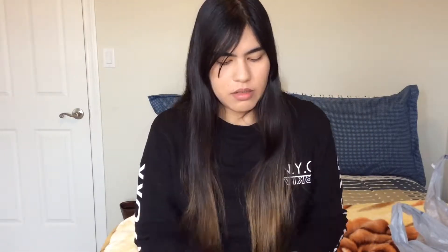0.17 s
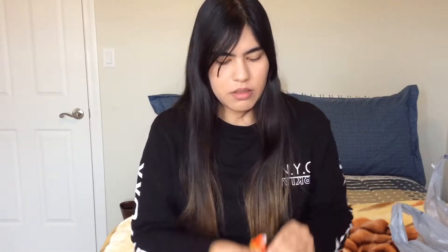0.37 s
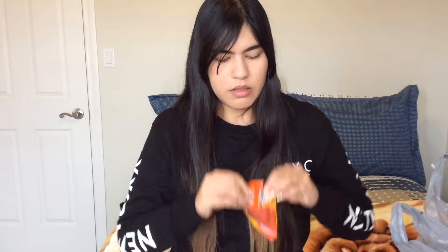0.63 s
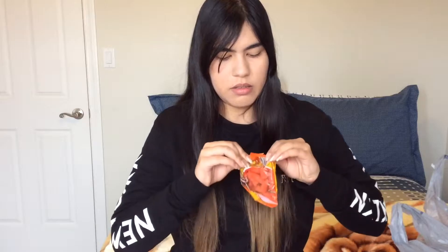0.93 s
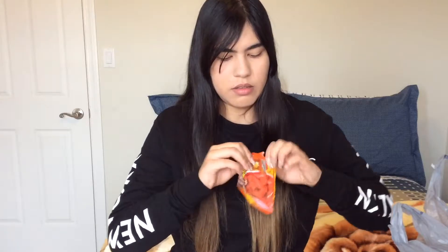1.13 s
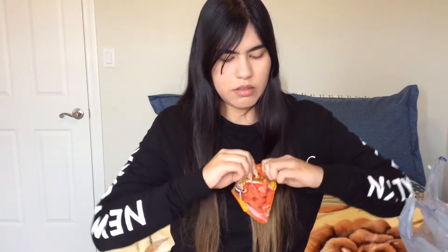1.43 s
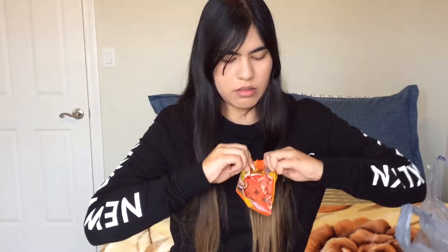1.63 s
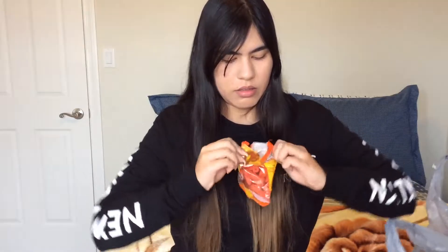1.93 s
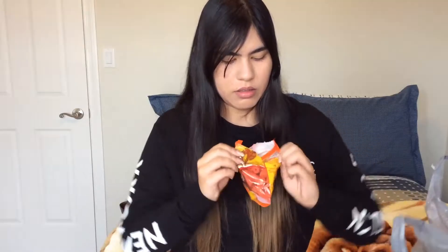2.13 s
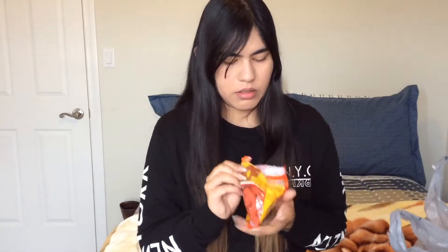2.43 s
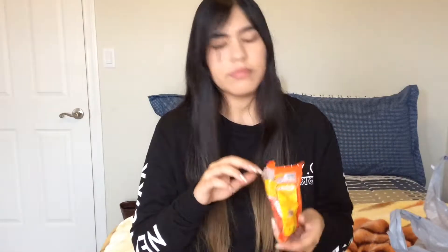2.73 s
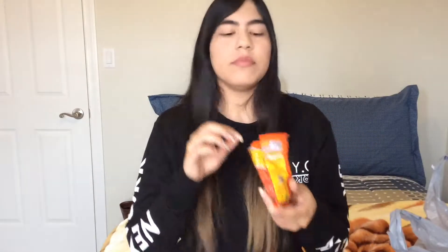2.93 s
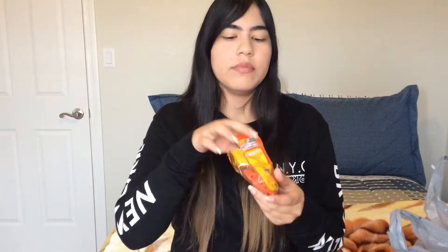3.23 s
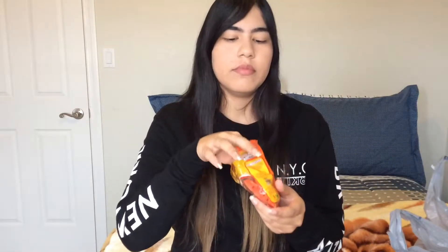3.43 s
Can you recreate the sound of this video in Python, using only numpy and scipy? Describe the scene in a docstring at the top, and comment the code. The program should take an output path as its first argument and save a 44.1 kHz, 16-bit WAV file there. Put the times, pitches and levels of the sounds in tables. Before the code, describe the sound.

A small plastic candy packet crinkles with crisp snaps and crackles, rips open in a short loud burst, then is handled more quietly; close-range microphone in a small bedroom with faint room tone.

```python
"""Bedroom: a small plastic candy packet is handled and torn open, a metre from the microphone.
Creases in the film snap singly (ring, bag knock, treble tick) and in dense crackle of filtered clicks;
taps push air softly. Echoes and a decaying tail throw the film sound back, over steady noise as room tone.
A hard edit joins two moments of the handling, so the first room tail stops dead."""
import sys
import numpy as np
from scipy import signal
from scipy.fft import rfft, irfft
from scipy.io import wavfile

SR = 44100
rng = np.random.default_rng(int(sys.argv[2]) if len(sys.argv) > 2 else 0)


def bounce(signal):
    """Save signal as a 16-bit WAV file at the path given by the first command-line argument."""
    frames = np.transpose(np.atleast_2d(signal))
    limited = np.clip(frames, -1, 1)
    pcm = np.round(limited * 32767).astype(np.int16)
    wavfile.write(sys.argv[1], SR, pcm)


N = 158760

EDIT_S = 2.7508
GRAIN_N = 768  # samples per snap or crackle grain
RISE_S = 0.00015
FLIP_DECAY_S = 0.0006
BURST_S = 0.003  # burst levels are rms over this time


def amp(db):
    """Amplitude factor of a level in dB."""
    return 10 ** (np.asarray(db) / 20)


def unit(x):
    """Scale each row to energy 1."""
    return x / np.linalg.norm(x, axis=-1, keepdims=True)


def evened(x):
    """Scale to rms 1."""
    return x / np.sqrt(np.mean(x ** 2) + 1e-20)


def read(points, hz):
    """Interpolate a frequency table along log frequency."""
    f, value = np.transpose(points)
    return np.interp(np.log(hz + 1), np.log(f + 1), value)


def snaps():
    """Each snap is a flip with a short ring, a low knock of the bag and a treble tick; rows: direct, wall send."""
    # loudest snaps: (time [s], ring [Hz], middle level [dB], low knock level [dB], treble level [dB],
    # wall send [dB])
    snap_table = [(0.031, 1530, -47.5, -51, -62, -2.5), (0.0936, 1420, -53, -63, -75, 10),
                  (0.123, 4700, -50, -53, -66, 7), (0.1556, 4300, -44.5, -51, -62, -5),
                  (0.1871, 3760, -49, -47, -60, -11), (0.2064, 1340, -44, -66, -74, -5),
                  (0.2312, 1220, -50, -50, -72, -9), (0.2518, 1410, -50, -44.5, -46, 6),
                  (0.2562, 1210, -40, -50, -44, -14), (0.2766, 3220, -36.5, -68, -45, -11),
                  (0.3323, 6030, -29, -56, -32, 3), (0.342, 1860, -32, -34, -37, 0.5),
                  (0.377, 6300, -54, -43.5, -40, 13), (0.38, 5500, -29.5, -54, -28, 2.5),
                  (0.3948, 4850, -34, -39, -34, 6), (0.4541, 2100, -36, -34.5, -35, 3),
                  (0.4754, 5200, -29.5, -43, -26.5, 4.5), (0.4878, 1860, -35.5, -48, -31, 10),
                  (0.5117, 1400, -21, -51, -45, -5), (0.531, 6460, -33.5, -44.5, -48, 6.5),
                  (0.5397, 2080, -29, -43, -50, -5), (0.5625, 5200, -30, -65, -23, -0.5),
                  (0.5753, 4050, -28.5, -58, -25, -8), (0.6066, 4090, -35, -40.5, -38, 0),
                  (0.6197, 5470, -41, -43, -44, 2), (0.638, 1230, -33, -38.5, -28, -4),
                  (0.664, 1290, -41, -46, -40, 0), (0.6694, 4230, -18.5, -53, -40, -6),
                  (0.6872, 3920, -23.5, -55, -24.5, -1.5), (0.699, 5000, -26, -38, -35, -22),
                  (0.7584, 3460, -18, -58, -16, -4.5), (0.8113, 1420, -35, -51, -36, 7),
                  (0.8187, 5940, -31.5, -59, -35, 5), (0.834, 2940, -39, -53, -34, -6),
                  (0.8433, 3730, -18.5, -41, -17, -1.5), (0.8653, 3750, -33, -35, -22, -12),
                  (0.9224, 1840, -41, -45, -70, 0), (1.0049, 6300, -34.5, -44, -32, 0.5),
                  (1.019, 1570, -32, -54, -52, -5), (1.1047, 4840, -39, -64, -43, 7),
                  (1.1122, 2470, -35, -39, -39, -6), (1.1456, 1480, -32, -52, -33.5, -11),
                  (1.1558, 5930, -62, -44, -33, 7), (1.1629, 2550, -29, -40, -34.5, -4),
                  (1.1847, 6100, -33, -47, -35, -20), (1.2001, 2640, -26.5, -34.5, -35, -5),
                  (1.2075, 3000, -39, -51, -39, 0), (1.2196, 6100, -23, -41, -26, -17),
                  (1.2712, 4200, -31.5, -45, -27, 3.5), (1.281, 4500, -27, -43, -30, -9),
                  (1.275, 4700, -21, -48, -25.5, -8), (1.298, 5940, -26, -53, -35, -23),
                  (1.3145, 5210, -30, -42, -44, -18), (1.3371, 5000, -22, -61, -48, -9.5),
                  (1.3588, 1160, -37, -54, -55, -6), (1.3734, 2460, -46, -44.5, -45, -5),
                  (1.4097, 1910, -42, -59, -49, 1), (1.4142, 4740, -47, -57, -45, -22),
                  (1.4308, 3270, -34, -42, -59, 4), (1.44, 5900, -44, -43, -22, -7.5),
                  (1.4754, 3300, -47, -62, -48, 7), (1.4826, 1970, -39, -62, -38, 5),
                  (1.5163, 5800, -46, -56, -28, -2), (1.5375, 3440, -17, -57, -17, -3.5),
                  (1.5825, 1090, -34.5, -35.5, -32.5, 0.5), (1.5991, 1910, -22.5, -45, -35, -9),
                  (1.6378, 2520, -32.5, -41, -32, -8), (1.7066, 6300, -52, -54, -46, -1),
                  (1.7236, 6600, -47.5, -51, -45, 2), (1.7496, 4730, -28, -40, -34, -22),
                  (1.7583, 1150, -36.5, -37, -35, -5), (1.772, 5030, -28, -38, -47, -5),
                  (1.7893, 5260, -22.5, -32, -39, -3), (1.8016, 1200, -35, -18.5, -26, -2.5),
                  (1.8107, 5000, -19, -33, -32, -6), (1.819, 2880, -25.5, -51, -23, 9.5),
                  (1.851, 1230, -19.5, -20, -17, -5.5), (1.8598, 6070, -33, -27, -18, -12),
                  (1.8774, 6600, -10, -24, -20, -18), (1.918, 5500, -27, -45, -37, -10),
                  (1.9224, 5650, -24.5, -30.5, -38, 4.5), (1.9471, 6350, -13.5, -43, -17, -9),
                  (1.962, 1860, -22, -25, -32, -7), (1.9693, 6200, -42, -25.5, -22, -15),
                  (1.972, 2840, -29, -42, -22, -3), (2.0253, 1250, -41, -54, -50, 4),
                  (2.0412, 1940, -40, -50, -37, 6.5), (2.074, 5950, -40, -41, -51, -6),
                  (2.1065, 1214, -43.5, -66, -42, 3), (2.1123, 1220, -40, -42, -58, -16),
                  (2.1535, 4520, -42, -57, -43, -21), (2.1751, 1520, -38.5, -39.5, -41, -29),
                  (2.202, 6440, -22.5, -51, -27.5, -5.5), (2.2297, 1350, -37.5, -40, -42, -2),
                  (2.249, 2100, -36, -52, -58, -5), (2.261, 1630, -27.5, -50, -30, -5.5),
                  (2.2954, 4800, -42, -38.5, -39, -5), (2.303, 5680, -45, -59, -33, -7),
                  (2.3311, 2060, -45, -45, -46, -16), (2.344, 6100, -49, -55, -42, -7),
                  (2.352, 5100, -28, -54, -32, -5), (2.3553, 6100, -26, -32, -30, -3),
                  (2.3756, 4570, -31, -36, -34, -14), (2.421, 1210, -40, -37.5, -46, -2.5),
                  (2.4432, 4000, -40, -57, -47, -19), (2.446, 3000, -22, -24.5, -27, -11),
                  (2.449, 3150, -26.5, -22, -25, -7), (2.4741, 7600, -35.5, -37.5, -40, -5),
                  (2.5018, 1550, -32.5, -48, -49, -6.5), (2.5468, 2440, -46, -60, -44, 14),
                  (2.5524, 5050, -49, -56, -48, 8), (2.5563, 1690, -48, -59, -45, 0),
                  (2.59, 1200, -36.5, -41, -42, -2), (2.6097, 3310, -32, -44, -34, 0),
                  (2.6287, 1250, -37, -36, -39, -3.5), (2.6551, 4230, -31, -46, -27.5, -2),
                  (2.6944, 3430, -47, -45, -52, -15), (2.7196, 6200, -35, -68, -28, -8),
                  (2.725, 5370, -51, -46, -39, -2), (2.8043, 3400, -47.5, -59, -45.5, 3),
                  (2.8231, 2350, -48, -46.5, -62, 5), (2.8632, 6740, -35, -49, -34, -8),
                  (2.9462, 1560, -51.5, -79, -73, 1), (2.9534, 6000, -61, -73, -69, -12),
                  (3.001, 2520, -29.5, -59, -41, -1), (3.052, 3640, -54, -63, -71, 2),
                  (3.115, 3300, -57, -59, -55, -1), (3.1897, 2440, -39, -50.5, -39.5, 3),
                  (3.2862, 4570, -49.5, -72, -56, 11.5), (3.3113, 1910, -38, -42, -39.5, -1.5),
                  (3.33, 1510, -48, -50, -54, -3), (3.3955, 1940, -51, -65, -69, -7),
                  (3.4182, 1720, -52, -57, -53, -2), (3.4568, 1290, -41.5, -39, -36.5, -2),
                  (3.512, 3200, -50, -49, -72.5, -4), (3.5661, 1890, -51, -49.5, -61, -10)]
    ring_share, ring_cycles = 0.56, 1.66
    band_ratio = 1.7  # flip band edges around the ring
    max_send_db = 6

    count = len(snap_table)
    all_knocks = knocks(count)
    all_ticks = flips(count, decay_s=0.00035, band_hz=(5000, 10220))
    phases = rng.random(count)
    out = np.zeros((2, N + GRAIN_N))
    for row, knock, tick, phase in zip(snap_table, all_knocks, all_ticks, phases):
        s, hz, db, low_db, high_db, send_db = row
        flip = flips(1, FLIP_DECAY_S, (hz / band_ratio, hz * band_ratio))[0]
        ring = ping(hz, ring_cycles, phase)
        middle = unit(ring_share * ring + (1 - ring_share) * flip)
        mix = amp(db) * middle + amp(low_db) * knock + amp(high_db) * tick
        snap = np.sqrt(BURST_S * SR) * mix
        start = round((s - RISE_S) * SR)
        out[:, start:start + GRAIN_N] += snap * amp([[0], [min(send_db, max_send_db)]])
    return out[:, :N]


def ping(hz, cycles, phase):
    """A facet of film rings for a few cycles; energy 1."""
    t = np.arange(GRAIN_N) / SR
    envelope = np.exp(-hz * t / cycles) * (1 - np.exp(-(t / RISE_S) ** 2))
    return unit(np.sin(2 * np.pi * (hz * t + phase)) * envelope)


def flips(count, decay_s, band_hz):
    """A sharp click with a short gritty noise trail, band-passed; energy 1, one per row."""
    grit_share = 0.85
    t = np.arange(GRAIN_N) / SR
    envelope = (1 - np.exp(-(t / RISE_S) ** 2)) * np.exp(-t / decay_s)
    grit = unit(rng.standard_normal((count, GRAIN_N)) * envelope)
    at_click = np.arange(GRAIN_N) == round(RISE_S * SR)
    click = at_click * rng.choice([-1., 1.], (count, 1))
    band = signal.butter(2, band_hz, "band", fs=SR, output="sos")
    return unit(signal.sosfilt(band, click + grit_share * grit))


def knocks(count):
    """Dull noisy flips; the air in the bag rings under each."""
    ring_share, ring_cycles = 0.4, 1.14
    rings = []
    for pitch, phase in rng.random((count, 2)):
        hz = 677 * (0.832 + 0.38 * pitch)  # 563 to 821 Hz
        rings.append(ping(hz, ring_cycles, phase))
    dull = flips(count, decay_s=0.0014, band_hz=(443, 1190))
    return unit(ring_share * np.array(rings) + (1 - ring_share) * dull)


def handling():
    """The fingers work the film as bright and low crackle; the seal rips in one dense rush."""
    # one list per moment of handling: (time [s], crackle level [dB], low crackle level [dB])
    moments = [
        [(0, -60, -54), (.1, -60, -70), (.245, -57.5, -71), (.255, -43, -60), (.32, -41, -48), (.36, -32, -59),
         (.45, -34, -51.5), (.55, -35, -55), (.7, -36.5, -46), (.74, -49, -49.5), (.8, -44.5, -59),
         (.86, -30.5, -42.5), (.9, -47.5, -55), (1.0, -46.5, -58.5), (1.1, -57, -61), (1.15, -41, -54),
         (1.22, -34, -41), (1.3, -33, -48), (1.38, -47, -53), (1.45, -42.5, -55), (1.55, -34.5, -38.5),
         (1.63, -39.5, -48.5), (1.68, -48.5, -61), (1.74, -48.5, -54.5), (1.76, -32, -48), (1.9, -27.5, -37),
         (1.98, -34, -34), (2.05, -41, -54.5), (2.18, -49.5, -50), (2.3, -42.5, -54.5), (2.345, -44.5, -51),
         (2.375, -31, -40), (2.42, -43.5, -63), (2.53, -51.5, -57.5), (2.57, -41, -47.5), (2.66, -39, -54),
         (2.75, -44, -49)],
        [(2.8, -74, -75), (2.83, -45.5, -54), (2.9, -54.5, -62), (2.97, -61.5, -90), (3.17, -67, -72),
         (3.25, -69, -59), (3.34, -55, -56), (3.45, -55, -59), (3.6, -70, -63)],
    ]
    tear_s, tear_hold_s, tear_fade_s = 1.8, 0.077, 0.0098
    tear_db, tear_low_db, tear_per_s = -20, -27, 3500

    t = np.arange(N) / SR
    levels = []
    for moment in moments:
        s, high_db, low_db = np.transpose(moment)
        levels.append([np.interp(t, s, high_db), np.interp(t, s, low_db)])
    db, low_db = np.where(t < EDIT_S, levels[0], levels[1])

    bright, dull = film_grains(), knocks(count=16)
    rip = amp(tear_db) * crackle(bright, tear_per_s, spread_db=1.3)
    rip += amp(tear_low_db) * crackle(dull, tear_per_s / 4, spread_db=0.97)
    tear = (t > tear_s) * np.exp(-np.maximum(t - tear_s - tear_hold_s, 0) / tear_fade_s)
    high = crackle(bright, per_s=700, spread_db=3.5)
    low = crackle(dull, per_s=500, spread_db=1.5)
    return amp(db) * high + amp(low_db) * low + tear * rip


def crackle(grains, per_s, spread_db):
    """Many small creases flip at random moments; a few are large. Rms 1."""
    size = amp(spread_db * np.minimum(rng.exponential(1, N), 3.0))
    hits = size * (rng.random(N) < per_s / SR)
    kind = rng.integers(0, len(grains), N)
    out = np.zeros(N)
    for k, grain in enumerate(grains):
        out += signal.oaconvolve(hits * (kind == k), grain)[:N]
    return evened(out)


def film_grains(count=24):
    """Broad flips in the colour of the film, leaning from dull to bright."""
    # colour of the crackle: (frequency [Hz], relative level [dB])
    film_colour = [(710, -42), (1200, 4), (1830, 6.5), (2620, 5), (3400, 4.5), (8000, 5), (14400, -10),
                   (15300, -15), (16000, -39)]
    hz = np.fft.rfftfreq(GRAIN_N, 1 / SR)
    tilt = 0.43 * np.linspace(-1, 1, count)[:, None]
    lean = ((hz + 1) / 4500) ** tilt
    raw = np.roll(flips(count, FLIP_DECAY_S, (500, 18000)), 40, axis=1)
    return unit(irfft(rfft(raw) * amp(read(film_colour, hz)) * lean, GRAIN_N))


def thumps():
    """A finger taps the air-filled bag: soft low pushes of air, each a quickly decaying sine."""
    # taps: (time [s], level [dB])
    taps_table = [(1.851, -38.5), (2.355, -58), (2.376, -41), (2.448, -34), (2.479, -61)]
    push_hz, peak_cycles, push_n = 264, 0.64, 1500
    turns = push_hz * np.arange(push_n) / SR
    envelope = turns * np.exp(1 - turns / peak_cycles) / peak_cycles
    push = np.sin(2 * np.pi * turns) * envelope
    out = np.zeros(N)
    for s, db in taps_table:
        out[round(s * SR):][:push_n] += amp(db) * push
    return out


def in_room(direct, send, count=4):
    """Direct sound plus echo patterns that take turns, as the echo paths change when the packet moves."""
    turn_s = 0.11
    turn = np.arange(N) / SR / turn_s
    out = direct
    for k in range(count):
        distance = abs((turn - k + count / 2) % count - count / 2)
        window = np.cos(np.pi / 2 * np.minimum(distance, 1))
        out = out + signal.oaconvolve(send * window, room())[:N]
    return out


def room():
    """Impulse response: single wall echoes plus sparse random taps dying band by band."""
    # wall echoes: (delay [s], level [dB])
    echo_table = [(.0053, -8), (.0082, -9.5), (0.0149, -18), (0.021, -18)]
    # tail decay: (frequency [Hz], time to fall 60 dB [s])
    decay_table = [(300, 0.37), (1000, 0.22), (3000, 0.3), (8000, 0.19), (14000, 0.27)]
    tail_db, tail_start_s, tail_build_s = -0.5, 0.003, 0.0027
    echo_shift_s = 0.00015  # largest random shift either way
    spacing = 20  # samples; one tap per slot

    taps = np.zeros(SR // 2)
    slots = np.arange(round(tail_start_s * SR), SR // 2 - spacing, spacing)
    taps[slots + rng.integers(0, spacing, len(slots))] = rng.choice([-1., 1.], len(slots))
    hz, t, bands = signal.stft(taps, SR, nperseg=128)
    decay = amp(-60 * t / read(decay_table, hz)[:, None])
    build = 1 - np.exp(-t / tail_build_s)
    tail = signal.istft(bands * decay * build, SR, nperseg=128)[1]
    out = amp(tail_db) * unit(tail)
    for s, db in echo_table:
        shift_s = echo_shift_s * rng.uniform(-1, 1)
        out[round((s + shift_s) * SR)] += amp(db)
    return out


def earlier():
    """The dying room tail of a crackle just before the start."""
    lead_s, level_db = 0.013, -33.5
    burst = np.sqrt(BURST_S * SR) * amp(level_db) * unit(film_grains().sum(0))
    tail = signal.oaconvolve(burst, room())[round(lead_s * SR):]
    return np.pad(tail, (0, N - len(tail)))


def air():
    """Steady room tone: white noise shaped by a fixed spectrum."""
    # room tone colour: (frequency [Hz], relative density [dB])
    air_colour = [(25, -14), (55, -1), (115, 0), (240, -3), (600, -8.5), (1500, -15), (3000, -22.5),
                  (8500, -21.5), (14000, -34), (16000, -45)]
    level_db = -59
    hz = np.fft.rfftfreq(N, 1 / SR)
    noise = rfft(rng.standard_normal(N))
    return amp(level_db) * evened(irfft(noise * amp(read(air_colour, hz)), N))


def scene():
    """Packet sound in the room, each side of the edit ringing on its own, plus earlier tail and air."""
    bass_cut_hz, crackle_send_db = 286, -8.5
    film = snaps() + handling() * amp([[0], [crackle_send_db]])  # rows: direct, wall send
    high_pass = signal.butter(2, bass_cut_hz, "high", fs=SR, output="sos")
    packet = signal.sosfilt(high_pass, film) + thumps()
    before = np.arange(N) < EDIT_S * SR
    out = earlier() + air()
    for side in (before, ~before):
        direct, send = packet * side
        out += in_room(direct, send) * side  # the tail stops at the edit
    return out[None]


def record(dry):
    """The converter saturates softly on the highest peaks, then a low-pass limits the band."""
    ceiling, edge_hz = 0.9, 15600
    held = dry / (1 + (abs(dry) / ceiling) ** 4) ** 0.25
    low_pass = signal.firwin(255, edge_hz, window=("kaiser", 9), fs=SR)
    return signal.oaconvolve(held, low_pass[None], "same")


dry = scene()
out = record(dry)
bounce(out)
```